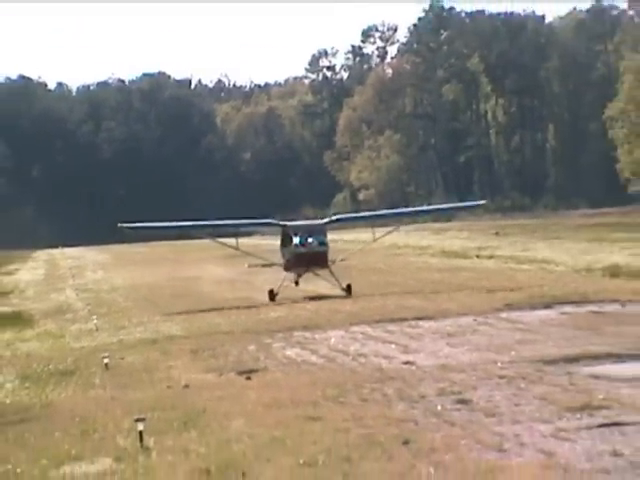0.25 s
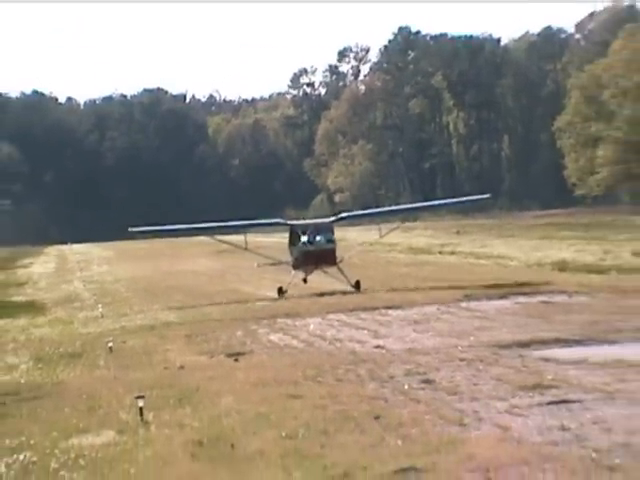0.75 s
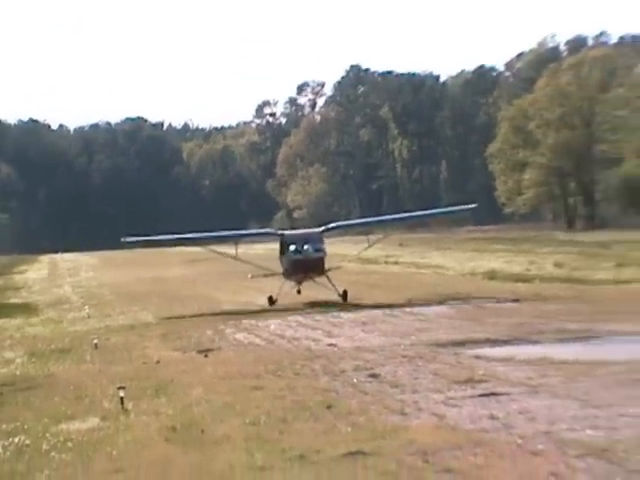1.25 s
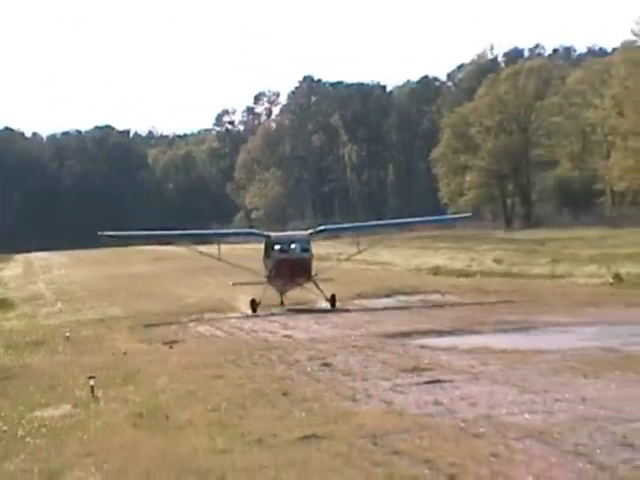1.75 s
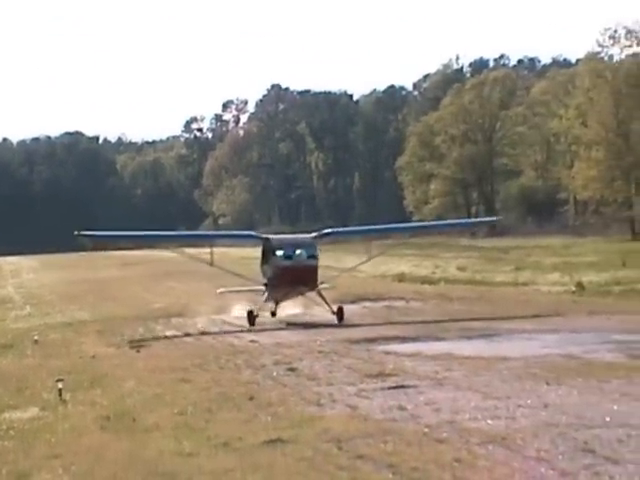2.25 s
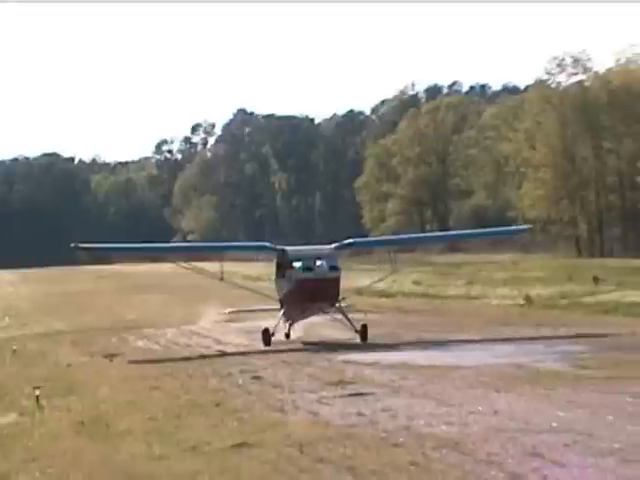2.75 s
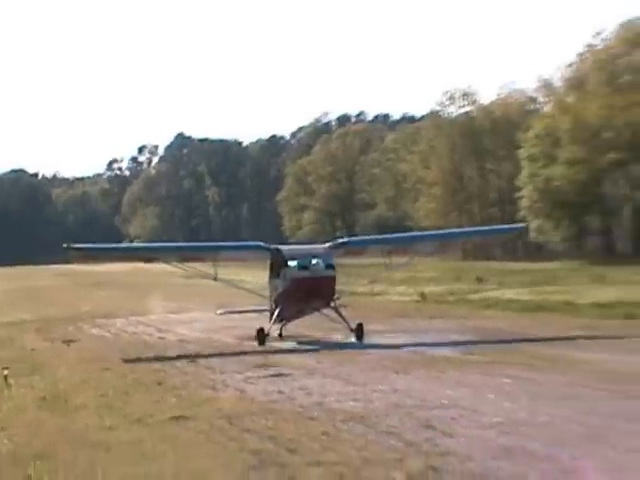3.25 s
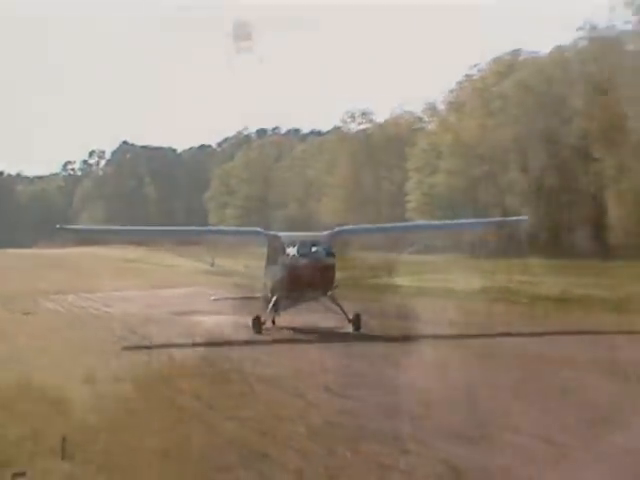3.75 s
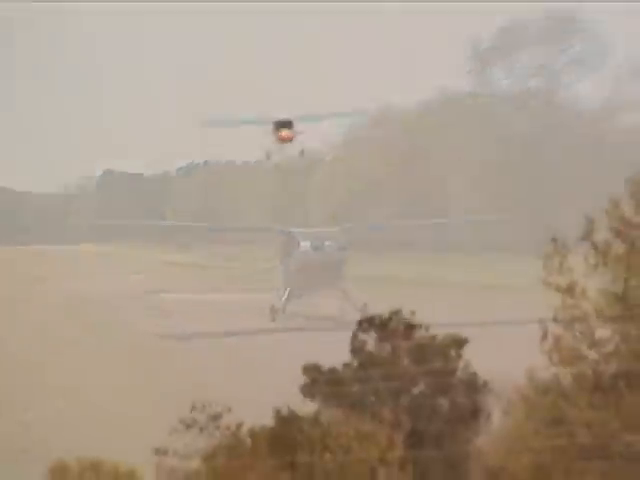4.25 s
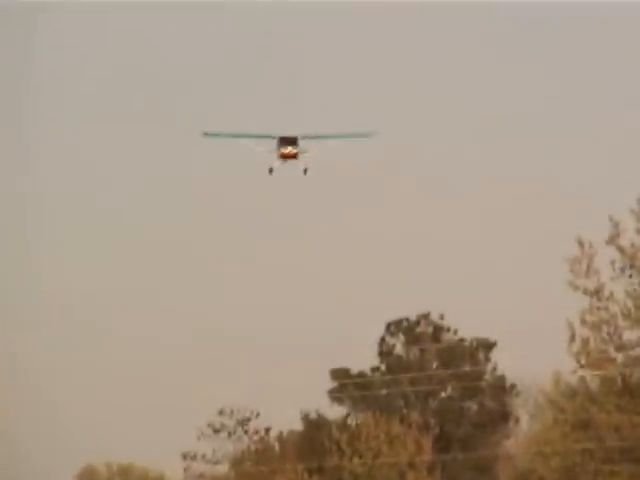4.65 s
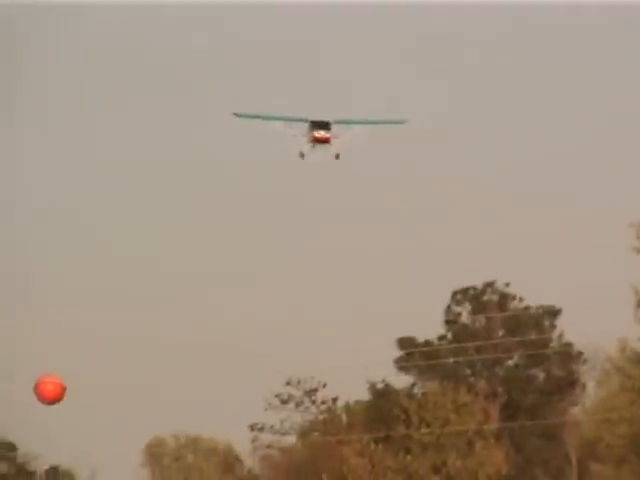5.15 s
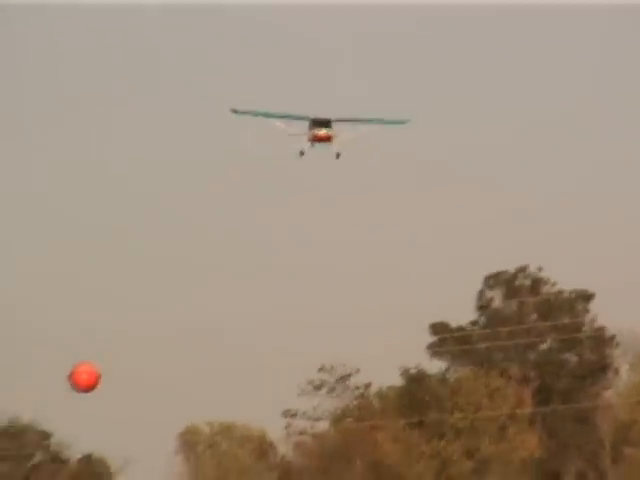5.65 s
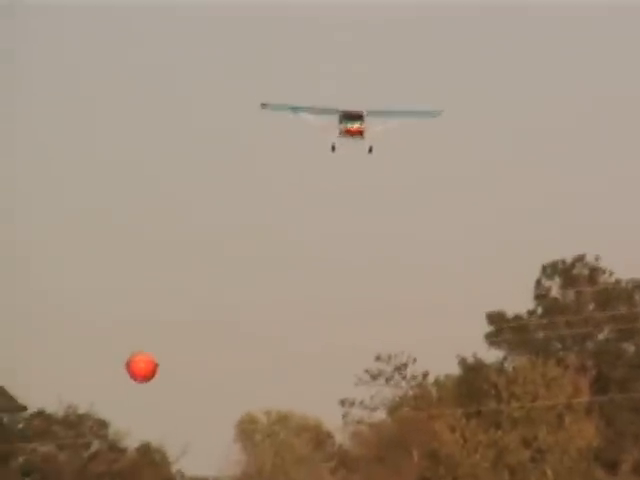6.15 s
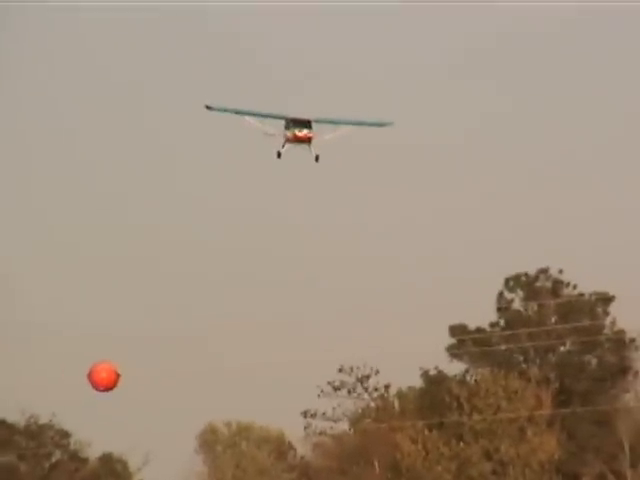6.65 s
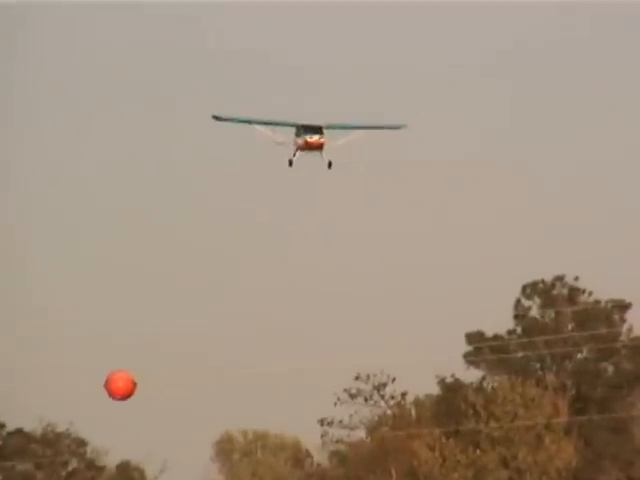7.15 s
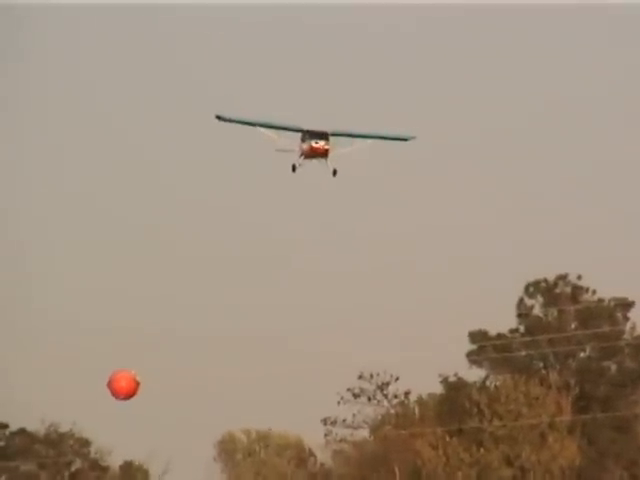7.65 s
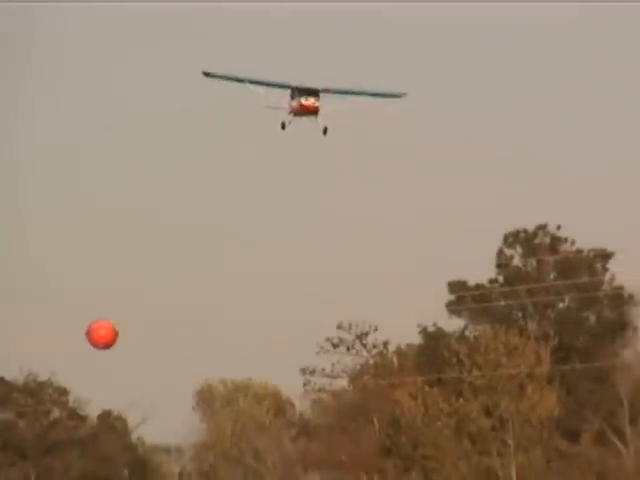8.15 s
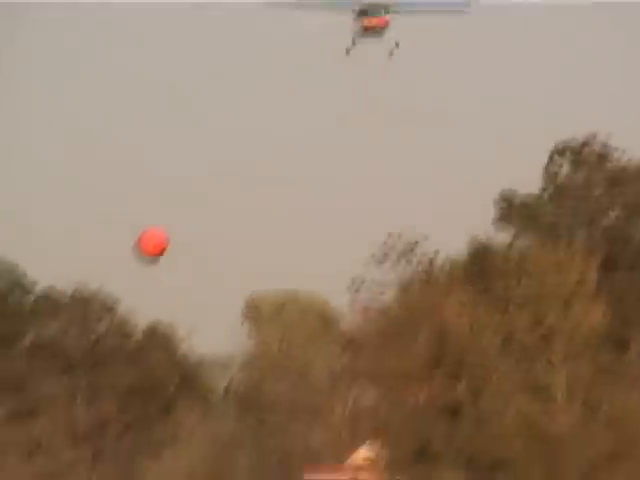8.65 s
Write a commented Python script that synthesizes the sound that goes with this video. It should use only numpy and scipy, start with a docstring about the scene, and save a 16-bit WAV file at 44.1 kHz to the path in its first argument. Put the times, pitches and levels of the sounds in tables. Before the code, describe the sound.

Camera microphone in an open field, slightly hissy with faint motor buzz. First a quiet idling propeller engine and distant insect trill, then wheels hit the ground and a loud hollow roar swells with bumps, grit and stone clicks. It crossfades into a smooth airborne engine drone, leaning left and slowly growing, with airy swishes. A near cricket rasps in long bouts; soft handling bumps come near the end.

```python
"""A light piston plane lands with its engine idling: low firing tones, exhaust sputter and chopped air.
Its tyres touch down and rumble over grass and gravel as shaped noise, with thuds, clacks and sprays.
The scene dissolves into a second approach: firing tones drone in the air under sweeping propeller swishes.
A cricket trills in bouts of raspy wing strokes, first farther off, then close by.
A camera's tape drive buzzes and whines faintly throughout, over microphone hiss."""
import sys
import numpy as np
from scipy import signal
from scipy.fft import rfft, irfft, next_fast_len
from scipy.io import wavfile
from scipy.ndimage import uniform_filter1d, map_coordinates

SR = 44100
rng = np.random.default_rng(int(sys.argv[2]) if len(sys.argv) > 2 else 0)


def store_pcm(level_fs):
    """Save levels as 16-bit WAV."""
    pcm = np.round(np.clip(level_fs, -1, 1) * 32767).astype(np.int16)
    wavfile.write(sys.argv[1], SR, np.atleast_2d(pcm).T)


N = 392931

# Spectra give only a shape; the sound they colour is scaled to rms 1 and levelled afterwards.

# microphone hiss and far field noise: freq_hz, level_db per Hz
HISS = [(35, 2), (80, 13), (300, 8), (2300, 4.5), (2700, -3), (3050, -3), (4000, -2), (5600, -4),
        (6400, -4), (7000, -7), (7800, -8), (8700, -7.5), (10500, -8.5), (12500, -11.5), (13400, -9),
        (14400, -15), (15000, -21), (15800, -21)]
# stereo likeness of the wide noises: freq_hz, left_right_likeness (0-1)
LIKENESS = [(40, 0.61), (130, 1), (1200, 0.97), (2500, 0.98), (5000, 0.6), (12000, 0.11)]
# tones of the camera, the tape drive's whine and a thin whistle at 15734 Hz: freq_hz, level_db (rms)
CAMERA_TONES = [(1723, -69), (1760, -72), (1809, -72), (1873, -69), (2024, -72), (2322, -73), (2472, -74),
                (2623, -68), (2697, -76), (2772, -75), (2922, -78), (3147, -79), (6293, -81), (6369, -81),
                (6444, -84), (6519, -81), (6594, -83), (6669, -84), (8691, -82), (9740, -82), (10341, -85),
                (11989, -86), (13269, -85), (13336, -83), (13486, -86), (15734, -89)]
# buzz of the tape heads: freq_hz, level_db
HEAD_BUZZ = [(700, -48), (1600, -14), (2300, -3), (2650, 2), (3000, -4), (3900, -8), (4600, -6), (5200, 0),
             (6400, -4), (7800, -9), (9800, -5), (12000, -8), (13400, -12), (14500, -13), (15500, -36)]
# whirr of the tape motor in the casing: freq_hz, level_db per Hz
MOTOR_WHIRR = [(2000, -28), (2480, -8), (2680, 2), (2850, -7), (3200, -12), (3900, -27), (5000, -29)]
# puffs of wind on the microphone: centre_s, level_db, half_length_s
PUFFS = [(0.116, -38, 0.027), (0.189, -39, 0.011), (1.608, -45, 0.026), (1.686, -55, 0.03)]
# soft bumps of the hand as the camera swings down: centre_s, level_db, half_length_s, rustle_db
HANDLING = [(8.613, -51, 0.0063, -14), (8.763, -53.5, 0.016, 3)]
# cricket bouts: start_s, end_s, level_db, strokes_per_s (once settled), pitch_hz (before the sag), nearness (0-1)
TRILLS = [(0.01, 0.23, -46.1, 49, 4760, 0.27), (0.24, 0.462, -46.1, 49, 4760, 0.27),
          (0.479, 0.595, -46.3, 49, 4760, 0.27), (0.606, 0.685, -46.5, 48, 4760, 0.27),
          (0.7, 1.148, -46.3, 49, 4760, 0.27), (2.221, 3.494, -46.2, 49, 4800, 0.1),
          (3.923, 4.44, -44.7, 50.5, 4730, 1), (4.599, 5.855, -44.5, 49.6, 4720, 1),
          (6.092, 7.32, -44, 49.6, 4700, 1), (7.555, 7.582, -43, 49, 4705, 1),
          (7.607, 7.815, -44, 50, 4690, 1), (8.018, 8.92, -44, 51.8, 4700, 1)]
# loudness through one wing stroke of average length, close by: time_s, level_db
WING_STROKE = [(0, -26), (.0007, -7), (.0026, -.5), (.006, 0), (.0085, -4.5), (.0112, -13), (.0135, -23),
               (.016, -42)]
# scrape of the wing's file under each stroke: freq_hz, level_db per Hz
FILE_RASP = [(2500, -25), (4000, -12), (5000, 0), (5600, -11), (6600, 0), (7900, -6), (9200, -7),
             (10500, -8), (12000, -12), (13900, -2), (15500, -15)]
# the near cricket emerges with the dissolve: time_s, gain_db
CRICKET_IN = [(3.92, -4.5), (4.5, 1.5)]
# sprays of grit and grass from the tyres: centre_s, level_db, half_length_s, centre_hz
SPRAYS = [(1.29, -53, 0.097, 3030), (2.89, -54, 0.1, 6900), (3.35, -62, 0.04, 9000),
          (3.48, -46.5, 0.058, 2680), (4.08, -61, .04, 12000)]
# stones flicked by the tyres: start_s, level_db (before a common trim), t60_s, snap_db (relative to the clack)
STONES = [(0.433, -31, 0.018, -18), (0.657, -36, .04, -9), (1.225, -36, 0.065, -6), (1.675, -32, 0.033, -3),
          (2.176, -22.5, 0.051, -22), (2.195, -32, 0.093, -18.5), (2.213, -24, 0.13, -25),
          (2.783, -38, .03, 4), (3.0, -37, 0.06, 5.5), (3.213, -31, 0.043, -8), (3.591, -33, .02, -2)]
# what a flicked stone rings with: freq_hz, level_db per Hz
CLACK = [(300, -24), (900, 3), (1500, 8.5), (1850, 13), (2150, 7.5), (2520, 12.5), (2950, 2), (3450, 9.5),
         (3900, 1), (4600, -15), (9000, -17), (15000, -28)]
# rolling undercarriage: freq_hz, level_db per Hz
THUD = [(40, -34), (80, -6), (120, -3.5), (150, 2.5), (195, -7), (260, -4.5), (340, -13), (450, -13),
        (800, -43), (2000, -80)]
# rolling airframe, before its resonances drift: freq_hz, level_db per Hz
ROAR = [(250, -33), (450, -11), (570, -1.5), (625, -0.5), (672, 4), (735, -1), (850, -2.5), (1030, -9.5),
        (1200, -2), (1320, -3.5), (1530, -8.5), (1800, -2), (2150, -12.5), (2480, -10.5), (3600, -74)]
# gravel under the tyres: freq_hz, level_db per Hz
GRIT = [(1500, -11), (2700, 5.5), (3300, 4), (4200, 1), (5600, -1.5), (7000, -8.5), (10000, -15.5),
        (13500, -19), (15000, -36)]
# the airframe's lowest resonance, singing out: freq_hz, level_db per Hz
RING = [(400, -60), (580, -25), (645, -6.5), (675, 2), (715, -8), (800, -28), (1100, -62)]
# bumps in the strip: centre_s, thud_db, half_length_s, roar_drop_db (as the tyres unload)
BUMPS = [(2.3, -42, 0.073, 7), (2.85, -38.5, 0.038, 0.5), (2.953, -36, 0.063, 1), (3.301, -35, 0.11, 1),
         (3.697, -37.5, 0.053, 3.5), (4.11, -36.5, 0.097, 2)]
# rougher and smoother ground: centre_s, hollow_boom_lift_db, upper_roar_lift_db, crunch_lift_db, half_length_s
PATCHES = [(2.04, 2, 1, 1, 0.035), (2.16, 2, 1, 1, 0.045), (2.5, 1.5, 1, -2, 0.055),
           (2.71, 0.5, 1.5, 0.5, 0.032), (2.797, -4.5, -1, 0.5, 0.023), (3.048, 1.5, 2.2, 1.5, 0.085),
           (3.313, -1.5, -0.5, 2.5, 0.035), (3.422, 3, 3, 0.5, 0.032), (3.5, -2, 4, -2, 0.036),
           (3.617, -1.5, -1.5, -0.5, 0.07), (4.07, 2.5, 2, 5, 0.034)]
# the roar's resonances drift, then rise as the plane rolls closer: time_s, pitch_ratio
RESONANCE_PITCH = [(2.0, 1.004), (2.18, 0.99), (2.55, 1.003), (3.1, 0.99), (3.48, 1.04), (3.65, 1.03),
                   (4.1, 1.07)]
# engine in the air: time_s, firing_rate_hz
FLIGHT_RATE = [(4.6, 56.3), (5.58, 57.93), (5.99, 57.5), (6.65, 58.56), (7.35, 57.27), (8.05, 56.5),
               (8.42, 56.7), (8.65, 56.25), (8.9, 55.4)]
# its tones: multiple of the firing rate, relative level_db, growth_db_per_s as it nears
FLIGHT_ORDERS = [(1, -20.5, -1), (2, -2.5, -1), (3, -4, 0.15), (4, -14, 1.87), (5, -22.5, -1.5),
                 (6, -27, -2)]
# exhaust burble in the air: freq_hz, level_db per Hz
BURBLE = [(25, -36), (70, -24), (120, -2), (160, 1.5), (240, 5.5), (290, -1), (335, -30), (500, -37)]
# propeller rush in the air: freq_hz, level_db per Hz
FLIGHT_AIR = [(40, -15), (200, 7), (350, -5.5), (450, -6.5), (600, 3), (800, -0.5), (1030, -1), (1450, -5),
              (1770, -6.5), (2100, -7), (2750, -12), (3300, -13.5), (6000, -37), (12000, -36)]
# low propeller swish: time_s, centre_hz, level_db
LOW_SWISH = [(5.6, 720, -63), (6.05, 1030, -60), (6.45, 1069, -54.5), (6.7, 820, -57), (7.05, 1080, -62),
             (7.55, 1120, -61), (8.2, 950, -69), (8.7, 618, -60)]
# high propeller swish that sweeps down: time_s, centre_hz, level_db
HIGH_SWISH = [(6.7, 2700, -65), (7.08, 2100, -60), (7.4, 1717, -60), (7.7, 1390, -60), (7.92, 1180, -65),
              (8.12, 1100, -58), (8.32, 1050, -53.5), (8.55, 950, -67)]
# thin hiss from the blade tips: time_s, centre_hz, level_db
TIP_SWISH = [(6.7, 2780, -66), (7.15, 2950, -66), (7.65, 3000, -66.5), (8.3, 2950, -75), (8.8, 2900, -62)]
# bright rush as the plane comes overhead: time_s, centre_hz, level_db
OVERHEAD_SWISH = [(8.62, 2250, -67), (8.76, 2260, -60), (8.9, 2230, -55)]
# idling engine: time_s, firing_rate_hz
IDLE_RATE = [(0, 26.2), (1.2, 26.44), (2.3, 26.6), (3.2, 26.21), (4.6, 24.96)]
# its tones: multiple of the firing rate, relative level_db
IDLE_ORDERS = [(2, -21), (3, -10), (4, -11.5), (5, -12), (6, -12), (7, -12.5), (9, -16)]
# its exhaust sputter: freq_hz, level_db per Hz
EXHAUST_PIPE = [(30, -27), (55, -22), (80, -7.5), (120, -1), (160, -9.5), (200, -2), (260, -2.5),
                (340, -22), (600, -28), (1500, -75)]
# its propeller air: freq_hz, level_db per Hz
IDLE_AIR = [(180, -15), (300, -2.5), (421, -9.5), (580, -3.5), (762, -3), (1000, -9), (1220, -4.5),
            (1500, -9.5), (1860, -5.5), (2170, -9.5), (2450, -6.5), (2700, -13.5), (2920, -9), (3170, -15),
            (3430, -12.5), (4060, -17), (5600, -14.5), (6400, -22), (9220, -28.5), (14000, -60)]

TOP_HZ = 15800  # the camera's band limit

# the landing dissolves into the second approach: (start s, end s)
LANDING_OUT, FLIGHT_IN = (4.28, 4.65), (4.33, 4.49)

# motor whirr at the left port; the casing rocks, so the right port gets this share inverted
WHIRR_DB, WHIRR_RIGHT = -57.5, 0.48

SAG_NEAR, SAG_FAR = 0.092, 0.146  # share of its pitch that a stroke loses in its first 12 ms
# a far cricket's strokes alternate, one high and strong, the next low and weak: (share of pitch, dB)
SWING, SWING_DB = 0.016, 0.8
RASP_DB = -17.5  # relative to the tone
GRASS_T60_S, GRASS_DB = 0.07, -13  # the grass smears the far song
ECHO_S, ECHO_DB = 0.0055, -17  # the song comes again off the ground

SPRAY_OCTAVES = 0.36
CLACK_ATTACK_S, STONE_TRIM_DB = 0.001, -7.0

# the wheels touch and take the weight; the roll swells to its loudest moment and eases off
TOUCHDOWN_S, SETTLE_S, LOUDEST_S = 1.925, 0.082, 3.41
ROLL_RISE_DB_PER_S, ROLL_FALL_DB_PER_S = 3, 4
THUD_DB, ROAR_DB, GRIT_DB = -40, -32, -47.5  # at the loudest moment, before bumps and patches
SOFTENING_DB_PER_S = 2.5  # the airframe's upper resonances weaken after touchdown
RING_DB, RING_S, RING_HALF_S = -37, 3.02, 0.13  # the ring swells and fades around 3.02 s, before the roll is at its loudest
# the crunch gains treble steadily as the wheels come closer; GRIT_TREBLE_DB is the lift at the loudest moment
GRIT_TREBLE_HZ, GRIT_TREBLE_DB, GRIT_TREBLE_DB_PER_S = 8000, 3, 2.5

# the plane in the air grows louder as it nears
DRONE_DB, DRONE_DB_PER_S = -50, 0.71
AIR_DB, AIR_DB_PER_S = -58.5, 1.1
UNEVEN_SHARE = 0.056  # the three cylinders of a bank differ in strength
SWISH_FADE_S = 0.2

# the idling engine grows louder as it glides in, until the wheels touch
EXHAUST_DB, EXHAUST_DB_PER_S = -48.5, 2
PROPELLER_DB, PROPELLER_DB_PER_S = -49, 3


def amp(db):
    """Decibels to gain."""
    return 10 ** (np.asarray(db) / 20)


def unit(x):
    """Scale to rms 1."""
    return x / np.sqrt(np.mean(x ** 2) + 1e-20)


def clock():
    """The time of every sample in seconds."""
    return np.arange(N) / SR


def along(points, hz):
    """Read (Hz, value) points on a log frequency axis."""
    f, v = np.transpose(points)
    return np.interp(np.log(hz + 1), np.log(f + 1), v)


def curves(rows):
    """One value per sample for each column after the time."""
    s, *cols = np.transpose(rows)
    return [np.interp(clock(), s, c) for c in cols]


def fade(start, end):
    """A ramp from 0 to 1 between two times."""
    return np.clip((clock() - start) / max(end - start, 1e-3), 0, 1)


def hump(s, length):
    """A smooth bell of height 1 around a moment."""
    return np.exp(-((clock() - s) / length) ** 2 / 2)


def wobble(rate):
    """A smooth random curve with rate knots a second."""
    knots = rng.standard_normal(int(N * rate / SR) + 4)
    return map_coordinates(knots, [np.arange(N) * rate / SR])


def noise_pair():
    """Two unrelated white noises."""
    return rng.standard_normal((2, N))


def filtered(x, response):
    """Multiply the spectrum of x by a response of frequency."""
    m = next_fast_len(N + SR // 2)
    return irfft(rfft(x, m) * response(np.fft.rfftfreq(m, 1 / SR)), m)[..., :N]


def coloured(x, spectrum):
    """x shaped by a spectrum, at rms 1."""
    return unit(filtered(x, lambda hz: amp(along(spectrum, hz))))


def placed(x, left_db):
    """Lean a sound to the left by a level difference."""
    return x * amp([[left_db / 2], [-left_db / 2]])


def widened(pair):
    """Two unrelated signals become one stereo sound, wider in the treble."""
    def mid_side(hz):
        turn = np.arccos(np.clip(along(LIKENESS, hz), -1, 1)) / 2
        return np.array([np.cos(turn), np.sin(turn)])

    mid, side = filtered(pair, mid_side)
    return np.array([mid + side, mid - side])


def spread(pair, spectrum):
    """A coloured stereo sound of rms 1."""
    return coloured(widened(pair), spectrum)


def rush(spectrum, patchy_db):
    """Stereo turbulence with time-frequency patches of random gain."""
    z = signal.stft(noise_pair(), nperseg=512)[2]
    field = rng.standard_normal(z.shape[1:])
    field = uniform_filter1d(field, size=4, axis=0)  # across frequency
    field = uniform_filter1d(field, size=16, axis=1)  # across time
    patchy = signal.istft(z * amp(patchy_db * unit(field)), nperseg=512)[1][:, :N]
    return spread(patchy, spectrum)


def grains(rate, scatter_db):
    """Two streams of tiny impacts of unequal size, rate a second in each."""
    hit = rng.random((2, N)) < rate / SR
    size = rng.standard_normal((2, N)) * amp(scatter_db * rng.standard_normal((2, N)))
    return unit(hit * size)


def even_ring(decay):
    """Keep the phase of a decaying burst but make its spectrum flat."""
    return irfft(np.exp(1j * np.angle(rfft(decay))))


def camera():
    """The spinning tape drum buzzes and whines, the motor whirrs, and the microphone hisses."""
    t = clock()
    drum_hz = 74.925
    turns = np.arange(int(N / SR * drum_hz))
    ticks = np.bincount((turns * SR / drum_hz).astype(int), minlength=N)
    # two heads pass each turn, the second more weakly
    half_turn = round(SR / drum_hz / 2)
    ticks = ticks + .45 * np.roll(ticks, half_turn)
    casing = even_ring(rng.standard_normal((2, SR // 100)) * amp(-60 * t[:SR // 100] / .015))
    heads = signal.fftconvolve(ticks[None], casing, axes=1)[:, :N]
    buzz = amp(-65.5) * coloured(heads, HEAD_BUZZ)
    whine = 0
    for hz, db in CAMERA_TONES:
        phase = 2 * np.pi * hz * t + .25 * wobble(9) + rng.normal(0, .7, (2, 1))
        whine = whine + amp(db + 3 + 1.2 * wobble(5)) * np.sin(phase)  # +3 dB: rms to peak
    hiss = amp(-53.5) * coloured(noise_pair(), HISS)
    rocking = np.array([[1], [-WHIRR_RIGHT]])
    whirr = amp(WHIRR_DB) * coloured(rng.standard_normal(N), MOTOR_WHIRR) * rocking
    return whine + buzz + whirr + placed(hiss, left_db=-3.5)


def wind():
    """Brief low buffets, different at each microphone port, over a faint breeze until the dissolve."""
    puffs = sum(amp(db) * hump(s, length) for s, db, length in PUFFS)
    breeze = amp(-71) * (1 - fade(*LANDING_OUT))
    low = [(10, -23), (35, -4), (75, 9), (130, 7.5), (300, -33), (1000, -70)]
    return (puffs + breeze) * coloured(noise_pair(), low)


def handling():
    """Dull knocks on the camera's casing, each a bell of dark noise with a little grainy rustle."""
    rub = spread(noise_pair(), [(150, -25), (330, -11), (460, 6), (650, -5), (1000, -4),
                                (1400, -22), (3000, -45), (8000, -70)])
    rustle = spread(grains(rate=2800, scatter_db=2.0),
                    [(600, -20), (1300, 3), (2500, 0), (3500, -15), (8000, -30)])
    return sum(amp(db) * hump(s, length) * (rub + amp(rustle_db) * rustle)
               for s, db, length, rustle_db in HANDLING)


def scattered(x):
    """The short diffuse tail that the grass gives to a far sound."""
    t = clock()[:SR // 12]
    tail = even_ring(rng.standard_normal((2, len(t))) * amp(-60 * t / GRASS_T60_S))
    return signal.fftconvolve(x, tail, axes=1)[:, :N]


def cricket():
    """Each wing stroke is a short raspy tone that sags in pitch; a near bout starts fast and settles."""
    t = clock()[:SR // 60]
    lead = np.array([[.74], [-.74]])  # radians by which the left port hears it early and the right late
    song, far, scrape = np.zeros((2, N + SR)), np.zeros((2, N + SR)), np.zeros(N + SR)
    for start, end, db, rate, pitch_hz, near in TRILLS:
        s, sag = start, SAG_FAR + (SAG_NEAR - SAG_FAR) * near
        for k, (gap, size, tune, stretch) in enumerate(rng.standard_normal((80, 4))):
            if s > end - .008:
                break
            # far strokes last longer
            age = t * np.exp(0.07 * stretch) / (1 + .17 * (1 - near))
            emerging_db = np.interp(s, *np.transpose(CRICKET_IN)) if near == 1 else 0
            turn = (1 - near) * (-1) ** k
            stroke_db = db + 0.84 + emerging_db + SWING_DB * turn + 0.75 * size
            swell = amp(stroke_db + np.interp(age, *np.transpose(WING_STROKE)))
            detune = (.009 - 0.0067 * near) * tune + SWING * turn
            hz = pitch_hz * (1 + detune) * (1 - sag * (age / 0.012) ** 1.76)
            slip = np.cumsum(rng.standard_normal(len(t))) * 0.022  # the file's teeth catch unevenly
            phase = 2 * np.pi * np.cumsum(hz) / SR + slip + lead
            second = amp(-8) * np.sin(2 * phase - .2 * lead)
            third = amp(-21.5) * np.sin(3 * phase - 1.6 * lead)
            tone = placed(np.sin(phase), 4 + 4.8 * near) + placed(near * (second + third), left_db=3.0)
            at = slice(int(s * SR), int(s * SR) + len(t))
            song[:, at] += swell * tone
            far[:, at] += (1 - near) * swell * tone
            scrape[at] += near * swell
            hurry = 1 + .13 * near * np.exp(-(s - start) / .22)
            s += (1 + .04 * gap) / (rate * hurry)
    file_noise = filtered(rng.standard_normal(N), lambda hz: np.exp(1.15j * lead * hz / 4700))
    rasp = amp(RASP_DB) * scrape[:N] * coloured(file_noise, FILE_RASP)
    song = song[:, :N] + amp(GRASS_DB) * scattered(far) + placed(rasp, left_db=-6.0)
    return filtered(song, lambda hz: 1 + amp(ECHO_DB) * np.exp(-2j * np.pi * hz * ECHO_S))


def sprays():
    """Short showers of grit: dense tiny impacts, each shower in its own band."""
    shower = grains(rate=20000, scatter_db=1.0)

    def band(centre_hz):
        return unit(filtered(
            shower, lambda hz: np.exp(-(np.log2((hz + 1) / centre_hz) / SPRAY_OCTAVES) ** 2 / 2)))

    return widened(sum(amp(db) * hump(s, length) * band(centre_hz)
                       for s, db, length, centre_hz in SPRAYS))


def stones():
    """Each flicked stone gives a short dry clack of decaying noise with a bright snap on top."""
    t = clock()
    clack = spread(noise_pair(), CLACK)
    snap = spread(noise_pair(), [(2500, -23), (5500, 10.5), (8500, 1.5), (11000, -10), (15000, -25)])
    out = 0
    for s, db, t60, snap_db in STONES:
        decay = amp(db + STONE_TRIM_DB - 60 * np.abs(t - s) / t60)
        out = out + decay * fade(s, s + CLACK_ATTACK_S) * (clack + amp(snap_db) * snap)
    return out


def firing_phase():
    """The idling engine's cycle in radians, one turn for each firing."""
    return 2 * np.pi * np.cumsum(curves(IDLE_RATE)[0]) / SR


def rising(x):
    """Play a noise at a changing speed, so that its resonances drift and climb."""
    speed, = curves(RESONANCE_PITCH)
    return np.array([map_coordinates(side, [np.cumsum(speed)], mode="mirror") for side in x])


def tyres():
    """Bumps thud through the undercarriage, the hollow airframe roars, gravel crunches."""
    t = clock()
    roll_db = -ROLL_RISE_DB_PER_S * np.maximum(LOUDEST_S - t, 0)
    roll_db = roll_db - ROLL_FALL_DB_PER_S * np.maximum(t - LOUDEST_S, 0)
    unload_db = sum(drop_db * hump(s, length) for s, _, length, drop_db in BUMPS)
    boom_db, upper_db, gravel_db = sum(np.outer(lifts, hump(s, length)) for s, *lifts, length in PATCHES)
    jolts = sum(amp(db) * hump(s, length) for s, db, length, _ in BUMPS)
    ruts = wobble(28.06)
    shake = 1 + 0.048 * np.cos(firing_phase())  # the engine shakes the roar and crunch

    thud_gain = np.hypot(amp(THUD_DB + 1.4 * roll_db), jolts)
    thud = thud_gain * amp(0.81 * ruts) * rush(THUD, patchy_db=-0.5)

    airframe = rising(spread(noise_pair(), ROAR))
    hollow = filtered(airframe, lambda hz: 1 / (1 + (hz / 1050) ** 6))
    # hard ground excites the upper resonances more than soft turf does
    upper_db = upper_db - SOFTENING_DB_PER_S * (t - TOUCHDOWN_S)
    airframe = amp(boom_db) * hollow + amp(upper_db) * (airframe - hollow)
    rattle_db = 1.4 * wobble(160)
    roar = amp(ROAR_DB + roll_db - unload_db + 0.49 * ruts + rattle_db) * shake * airframe
    ring = amp(RING_DB) * hump(RING_S, RING_HALF_S) * spread(noise_pair(), RING)

    crunch = spread(grains(rate=14000, scatter_db=0.5), GRIT)
    coarse = filtered(crunch, lambda hz: 1 / (1 + (hz / GRIT_TREBLE_HZ) ** 6))
    treble_db = GRIT_TREBLE_DB + GRIT_TREBLE_DB_PER_S * (t - LOUDEST_S)
    crunch = coarse + amp(treble_db) * (crunch - coarse)
    flutter_db = 0.7 * wobble(40)
    grit = amp(GRIT_DB + roll_db + gravel_db - 0.15 * unload_db + flutter_db) * shake * crunch

    weight = fade(TOUCHDOWN_S, TOUCHDOWN_S + SETTLE_S)
    rolling = placed(thud, left_db=4.0) + placed(roar + ring, left_db=1.95) + placed(grit, left_db=-1.0)
    return rolling * weight * (1 - fade(*LANDING_OUT))


def swish(track, octaves):
    """A band of propeller noise that drifts in pitch as the plane banks."""
    centre_hz, swish_db = curves(track)
    hz, s, z = signal.stft(rng.standard_normal(N), SR, nperseg=512)
    offset = np.log2((hz[:, None] + 1) / np.interp(s, clock(), centre_hz))
    band = np.exp(-(offset / octaves) ** 2 / 2)
    band = band / np.linalg.norm(band, axis=0)  # equal power at every pitch
    noise = signal.istft(z * band, nperseg=512)[1][:N]
    first_s = track[0][0]
    return amp(swish_db) * fade(first_s - SWISH_FADE_S, first_s) * unit(noise)


def flying_plane():
    """Clean firing orders over a rough exhaust burble and the rush of the propeller."""
    firing_hz, = curves(FLIGHT_RATE)
    nearing_s = np.maximum(clock() - FLIGHT_IN[1], 0)
    phase = 2 * np.pi * np.cumsum(firing_hz) / SR
    orders = sum(amp(db + growth * nearing_s + 0.38 * wobble(4.3)) * np.cos(round(k) * phase)
                 for k, db, growth in FLIGHT_ORDERS)
    cylinders = 1 + UNEVEN_SHARE * np.cos(phase / 3)
    drone = unit(orders * cylinders * amp(0.22 * wobble(55)))  # firing strength varies at random
    burble = amp(-10.0) * rush(BURBLE, patchy_db=1.0) * (1 + .5 * np.cos(phase))
    engine = amp(DRONE_DB + DRONE_DB_PER_S * nearing_s) * (drone + burble)
    air = amp(AIR_DB + AIR_DB_PER_S * nearing_s) * rush(FLIGHT_AIR, patchy_db=1.0)
    air = air + swish(LOW_SWISH, octaves=0.49) + swish(HIGH_SWISH, octaves=0.21)
    air = air + swish(TIP_SWISH, octaves=0.12) + swish(OVERHEAD_SWISH, octaves=0.12)
    air = air * (1 + 0.015 * np.cos(phase))
    return (placed(engine, left_db=7.5) + placed(air, left_db=3.5)) * fade(*FLIGHT_IN)


def idling_engine():
    """Low firing orders and a sputtering exhaust; the propeller chops the air at the same rate."""
    glide_s = np.minimum(clock(), TOUCHDOWN_S)
    phase = firing_phase()
    orders = 0
    for k, db in IDLE_ORDERS:
        # reflections from the ground and trees make each order swell and fade on its own
        swell = amp(db + 4.5 + 1.8 * wobble(4.72))
        drift = rng.uniform(0, 2 * np.pi) + 0.5 * wobble(8.9)
        orders = orders + swell * np.cos(round(k) * phase + drift)
    sputter = (1 + 0.18 * np.cos(phase)) * rush(EXHAUST_PIPE, patchy_db=0)
    exhaust = amp(EXHAUST_DB + EXHAUST_DB_PER_S * glide_s) * (orders + sputter)
    chop = 1 + 0.14 * np.cos(phase) + 0.063 * np.cos(phase / 2)  # one beat per blade and one per turn
    air = amp(PROPELLER_DB + PROPELLER_DB_PER_S * glide_s) * chop * rush(IDLE_AIR, patchy_db=1.5)
    return (placed(exhaust, left_db=1.5) + placed(air, left_db=0.8)) * (1 - fade(3.84, 4.5))


def scene():
    """The field, the landing and the second approach."""
    field = camera() + wind() + handling() + cricket()
    ground_roll = sprays() + stones() + tyres()
    return field + ground_roll + flying_plane() + idling_engine()


def record(dry):
    """The camera keeps nothing above its band limit."""
    return filtered(dry, lambda hz: hz < TOP_HZ)


dry = scene()
out = record(dry)
store_pcm(out)
```